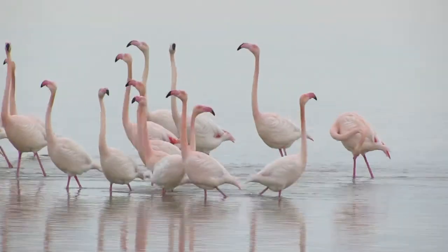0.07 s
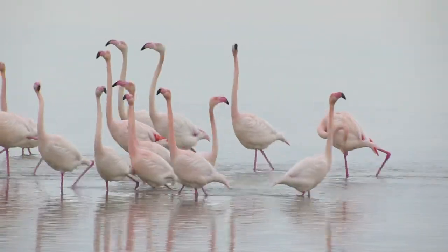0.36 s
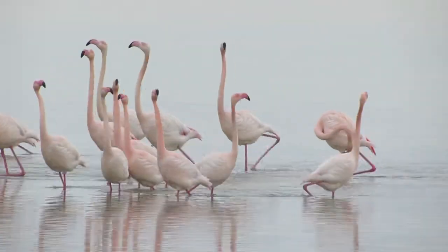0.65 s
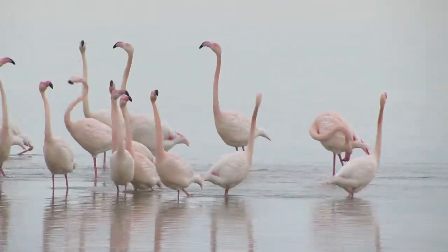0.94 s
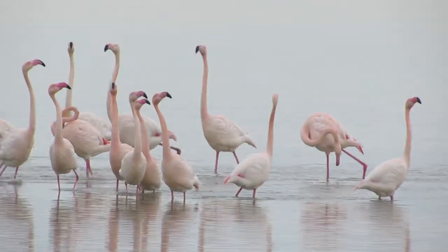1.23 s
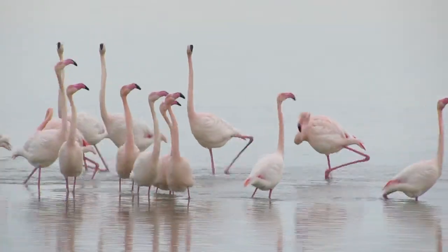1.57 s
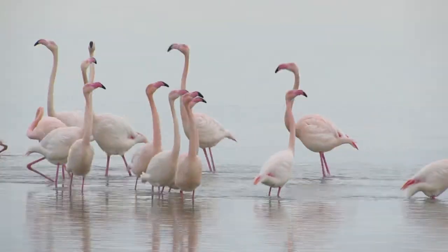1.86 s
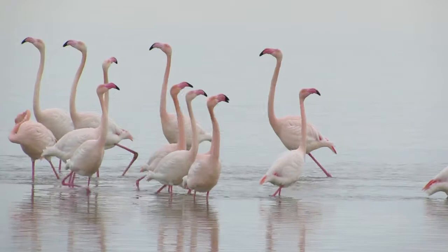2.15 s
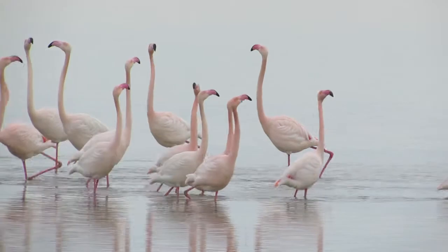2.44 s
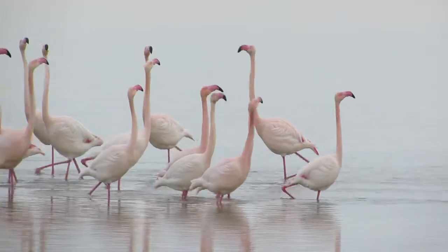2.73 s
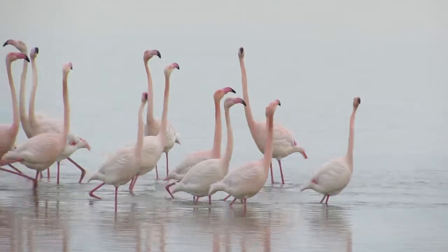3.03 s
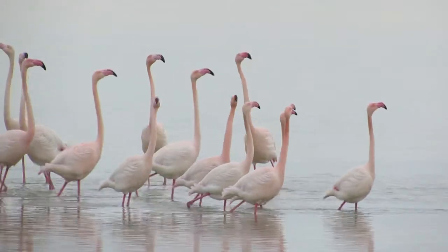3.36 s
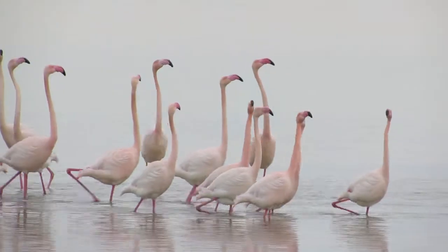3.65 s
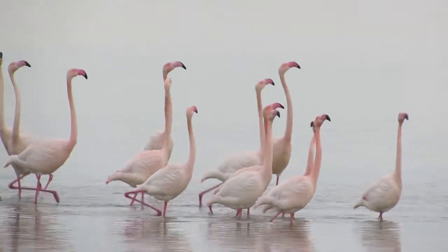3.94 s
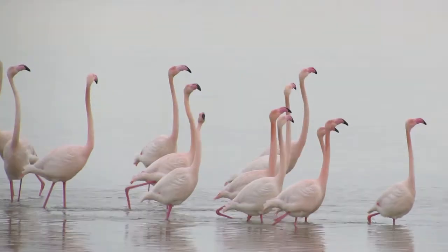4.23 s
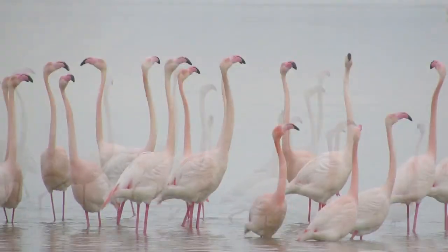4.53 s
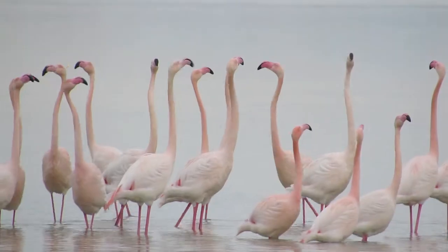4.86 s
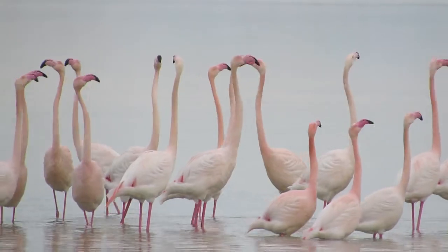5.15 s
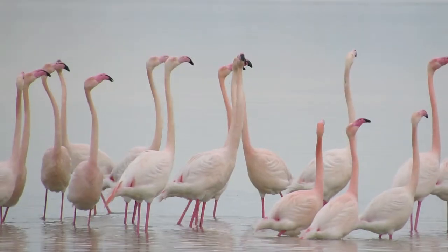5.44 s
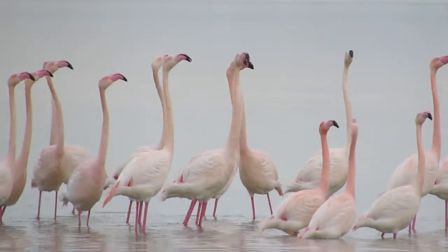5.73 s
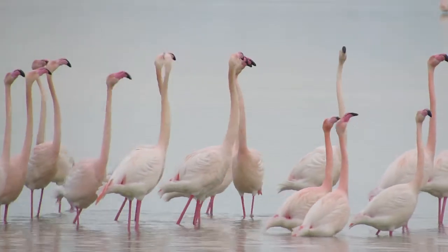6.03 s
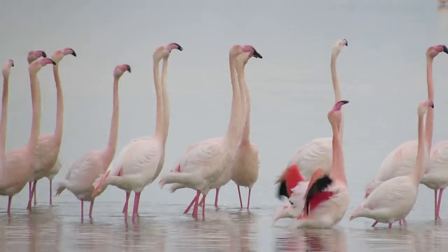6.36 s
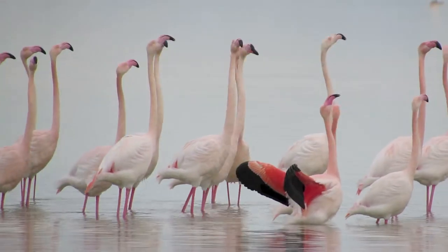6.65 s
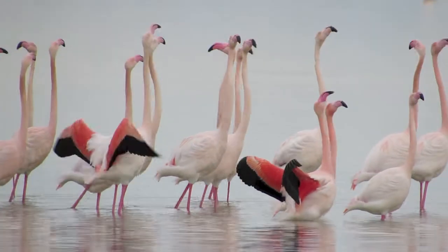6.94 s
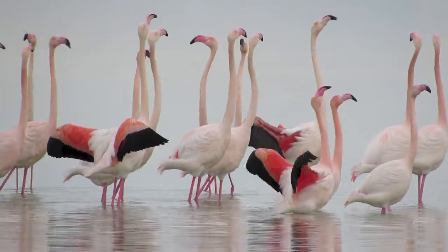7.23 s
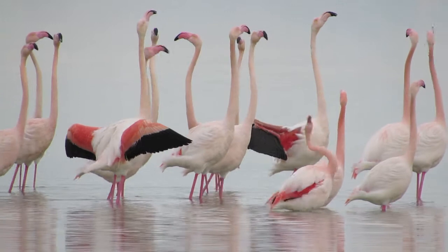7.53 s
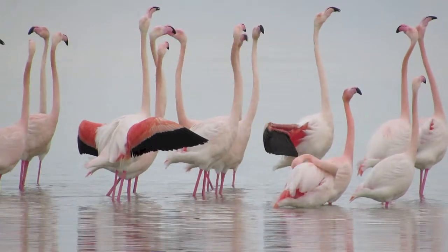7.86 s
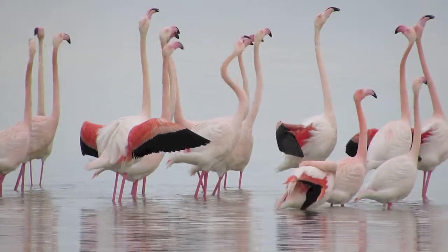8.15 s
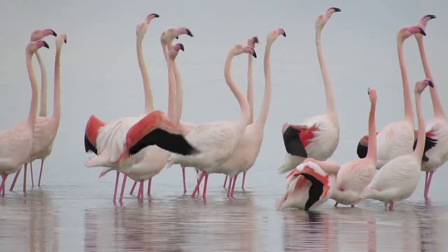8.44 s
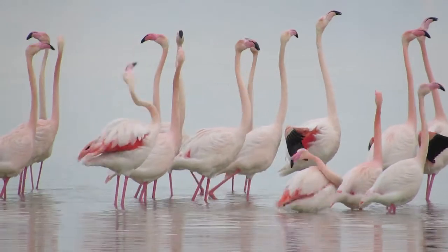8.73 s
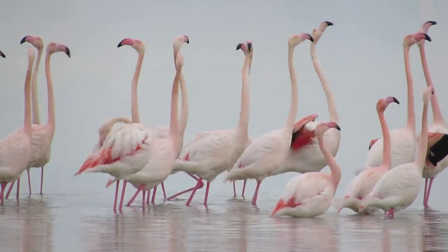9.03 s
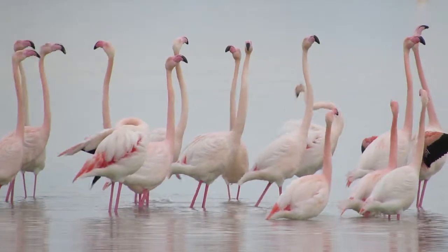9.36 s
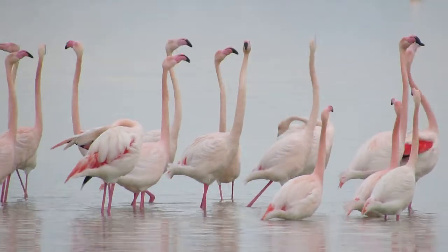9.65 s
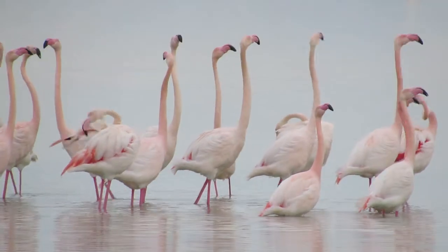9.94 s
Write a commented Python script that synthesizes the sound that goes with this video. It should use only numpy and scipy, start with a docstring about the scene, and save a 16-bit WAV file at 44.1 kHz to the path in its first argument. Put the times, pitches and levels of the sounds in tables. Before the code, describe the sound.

A few flamingos call some way off in an open lagoon, with quick rattling grunts and short nasal honks over the murmur of a distant flock. About halfway through, the whole flock joins in, calling over one another. An occasional falling cry slips between the honks, and a small bird chirps thinly now and then. A low rumble and soft hiss run underneath, with a faint hum growing later.

```python
"""Flamingos parade in a shallow lagoon, some way off. First a few marchers call: rattling grunts (about 65
rasping puffs a second) and some arched, nasal honks, over the far flock's murmur, a low background rumble and a
soft hiss. Just after 2 s comes the first of a few falling cries. At about 4.5 s the scene changes: a fuller
flock calls over one another, a small bird chirps now and then, and a faint low hum grows behind them."""
import sys
import numpy as np
from scipy import signal
from scipy.fft import rfft, irfft, next_fast_len
from scipy.io import wavfile
from scipy.ndimage import uniform_filter1d, map_coordinates

SR = 44100
rng = np.random.default_rng(int(sys.argv[2]) if len(sys.argv) > 2 else 0)


def store_pcm(level_fs):
    """Save levels as 16-bit WAV."""
    pcm = np.round(np.clip(level_fs, -1, 1) * 32767).astype(np.int16)
    wavfile.write(sys.argv[1], SR, np.atleast_2d(pcm).T)


N = 440559
FLOCK_FROM_S = 4.5  # from here on the scene changes to a fuller flock, with other voices


def amp(db):
    """Turn decibels into a number to multiply by."""
    return 10 ** (np.asarray(db) / 20)


def unit(x):
    """Scale a sound to an average power of 1."""
    return x / np.sqrt(np.mean(x ** 2) + 1e-20)


def along(points, hz):
    """Read between (frequency, value) points on a log frequency scale."""
    f, v = np.transpose(points)
    return np.interp(np.log(hz + 1), np.log(f + 1), v)


def loudness(points):
    """Join (time, level) points into a gain for every sample."""
    s, db = np.transpose(points)
    return amp(np.interp(np.arange(N) / SR, s, db))


def filtered(x, response):
    """Multiply each frequency in x by response(frequency)."""
    n = x.shape[-1]
    m = next_fast_len(n + SR // 20)
    return irfft(rfft(x, m) * response(np.fft.rfftfreq(m, 1 / SR)), m)[..., :n]


def shaped(x, tone):
    """Turn lows and highs up or down along (frequency, level) points."""
    return filtered(x, lambda f: amp(along(tone, f)))


def resonance(f, centre_hz, width_hz):
    """A steep peak of power around one frequency, averaging 1."""
    power = 1 / (1 + ((f ** 2 - centre_hz ** 2) / (f * width_hz + 1)) ** 2) ** 2
    return power / power.mean(axis=-1, keepdims=True)


def ringing(gain):
    """A filter with these gains that rings after a tap, not before (minimum phase)."""
    cepstrum = irfft(np.log(gain + 1e-6))
    half = cepstrum.shape[-1] // 2
    fold = np.r_[1, np.full(half - 1, 2), 1, np.zeros(half - 1)]
    return np.exp(rfft(cepstrum * fold))


def add(track, s, sound):
    """Mix a sound into the track at s seconds."""
    start = round(s * SR)
    part = sound[max(0, -start):max(0, N - start)]
    track[max(0, start):][:len(part)] += part


PUFF_LEAD_S = .012  # from the start of a puff's row to its middle


def rattle(length, rate, buzz_hz, half_s=.0049, breath=.27, leak=.1,
           jitter=0.12, scatter_db=1.5, arch_db=5.5):
    """The bird's voice box opens in short puffs, one row each; in each its membranes slap a few times."""
    count = int(length * rate) + 1
    t = np.arange(1536) / SR - PUFF_LEAD_S
    chance = np.random.default_rng(rng.integers(2 ** 32))
    opening = np.exp(-(t / half_s) ** 4) + leak * np.exp(-(t / (2 * half_s)) ** 2)
    beats = np.arange(-4, 5) + chance.random() - .5
    slap_times = (beats + jitter * chance.standard_normal((count, len(beats)))) / buzz_hz
    slaps = np.zeros((count, len(t)))
    slaps[np.arange(count)[:, None], np.searchsorted(t, slap_times)] = 1
    hiss = chance.standard_normal(slaps.shape)
    puffs = np.sqrt(1 - breath) * unit(slaps * opening) + np.sqrt(breath) * unit(hiss * opening)
    place = (np.arange(count) + .5) / count * 2 - 1
    sizes = amp(scatter_db * chance.standard_normal(count) - arch_db * place ** 2)
    return unit(puffs * sizes[:, None]) * np.sqrt(SR / rate / len(t))


# The tone of a grunt's rasp: (frequency [Hz], relative level [dB])
RASP_TONE = [(300, -63), (2400, -27), (3100, 11), (3800, 11), (4500, 15), (5200, 9), (5900, -13),
             (7000, -5.5), (8500, -9.5), (10000, -27), (14000, -7)]


def rasp(f, effort_db, tilt=0.69, most_db=12):
    """Power of the hiss on a grunt: the harder the bird pushes, the higher it reaches."""
    octaves = np.clip(np.log2((f + 1) / 5200), 0, 1)
    lift_db = tilt * np.clip(effort_db, -most_db, most_db) * np.sqrt(octaves)
    return amp(along(RASP_TONE, f) + lift_db) ** 2


# One row a grunt; gape is the share of the power that mouth and beak take:
# (start [s], length [s], puff rate [Hz], throat [Hz], level [dB], gape [0-1], rasp over the level [dB])
GRUNT_CALLS = [(0.002, 0.075, 73.0, 852, -33.5, 0.44, -17.5), (0.086, 0.076, 74.2, 847, -35.0, 0.53, -17.5),
               (0.168, 0.138, 61.8, 796, -38.5, 0.54, -13), (0.335, 0.11, 68.9, 850, -37, 0.6, -20),
               (0.45, 0.09, 71.6, 840, -38.5, 0.9, -19), (0.563, 0.09, 61.0, 875, -44.5, 0.5, -7.5),
               (0.7253, 0.079, 70.0, 796, -36, 0.19, -20), (0.822, 0.099, 64.3, 756, -35, 0.62, -14.5),
               (1.002, 0.081, 68.5, 950.0, -37, 0.7, -16), (1.088, 0.096, 67.6, 783, -38.5, 0.56, -19),
               (1.18, 0.14, 68.0, 776, -42, 0.87, -16), (1.379, 0.1, 74.7, 870, -42, 0.47, -15),
               (1.49, 0.076, 72.1, 712, -37.5, 0.8, -21), (1.571, 0.081, 71.8, 906, -38, 0.83, -9),
               (1.766, 0.102, 63.8, 863, -40, 0.28, -9.0), (1.905, 0.055, 62.2, 752, -38.0, 0.5, -27.0),
               (2.176, 0.06, 75.6, 800, -41.5, 0.1, -41), (2.264, 0.051, 70.2, 652, -39.5, 0.43, -13),
               (2.339, 0.068, 65, 836, -38, 0.14, -9.5), (2.414, 0.11, 59.4, 763, -37, 0.15, -19.5),
               (2.539, 0.121, 62.6, 786, -40.5, 0.16, -16.5), (2.661, 0.137, 62.7, 803, -41, 0.22, -17.5),
               (2.834, 0.071, 64.8, 895.0, -39, 0.34, -12.5), (2.911, 0.087, 63.1, 855, -39, 0.24, -9),
               (3.165, 0.043, 58.5, 780, -46, 0.44, -30), (3.34, 0.048, 69.1, 963, -39.5, 0.23, -10.0),
               (3.443, 0.101, 72.9, 707, -43.5, 0.4, -11), (3.644, 0.089, 63, 846, -39, 0.5, -5.5),
               (3.844, 0.058, 62.1, 880.0, -44.5, 0.28, -12), (3.99, 0.087, 63.7, 862, -39.5, 0.32, -11),
               (4.119, 0.084, 65, 792, -40, 0.43, -9), (4.665, 0.117, 64.2, 870.0, -39.5, 0.02, -11),
               (4.796, 0.121, 69.9, 832, -39.5, 0.06, -9.0), (4.927, 0.144, 59.04, 795, -37, 0.09, -13),
               (5.057, 0.14, 69.4, 877, -39, 0.17, -11), (5.191, 0.107, 69.3, 883, -38.5, 0.1, -10),
               (5.299, 0.123, 69.1, 816, -47, 0.4, -5), (5.518, 0.078, 70.6, 910, -42, 0.23, -9),
               (5.615, 0.105, 70.1, 956, -42, 0.39, -10), (5.722, 0.052, 68.3, 795, -39.5, 0.2, -26.0),
               (5.78, 0.091, 71.6, 896, -37.5, 0.23, -18.0), (5.887, 0.083, 66.3, 775, -37, 0.16, -9),
               (5.977, 0.108, 68.9, 805, -36.5, 0.2, -10.5), (6.129, 0.087, 72.8, 816, -36, 0.16, -10),
               (6.226, 0.1, 72.5, 900, -36.0, 0.24, -8), (6.333, 0.091, 72.0, 942, -35.5, 0.14, -6),
               (6.426, 0.071, 73.8, 817, -38.5, 0.12, -10), (6.665, 0.043, 58.8, 880, -40.0, 0.23, -28),
               (6.713, 0.069, 65.2, 827, -39.5, 0.18, -22), (6.82, 0.104, 71.6, 860.0, -38, 0.28, -29),
               (6.95, 0.06, 58.2, 787, -40.5, 0.07, -10.0), (7.013, 0.091, 61.2, 807, -39.5, 0.4, -7.5),
               (7.188, 0.116, 64.8, 876, -40.5, 0.18, -8), (7.323, 0.134, 63.3, 910.0, -42.5, 0.23, -6.5),
               (7.539, 0.12, 73.5, 886, -40.5, 0.44, -5), (7.649, 0.073, 62.0, 745.0, -45, 0.05, -9),
               (7.733, 0.081, 68.0, 880, -40.5, 0.34, -9), (7.821, 0.116, 73.5, 833, -42, 0.28, -12.0),
               (7.951, 0.087, 72.1, 976, -38, 0.12, -6), (8.044, 0.106, 60.2, 785, -37, 0.35, -8),
               (8.164, 0.086, 63.3, 794, -39, 0.5, -6), (8.254, 0.113, 66.6, 848, -37.5, 0.17, -4),
               (8.422, 0.077, 58.1, 960, -43.5, 0.36, -17.0), (8.518, 0.075, 72.5, 796, -40.5, 0.15, -12),
               (8.631, 0.067, 67.2, 843, -43, 0.45, -6), (8.754, 0.043, 57.8, 890, -45, 0.22, -26),
               (8.831, 0.098, 66.3, 820.0, -36, 0.08, -19.5), (8.93, 0.089, 61.5, 810.0, -42.5, 0.7, -8),
               (9.044, 0.099, 66.5, 756, -35.0, 0.17, -10), (9.199, 0.133, 65, 737, -39, 0.38, -17),
               (9.335, 0.122, 69.5, 860, -42.5, 0.44, -4.5), (9.456, 0.101, 64.7, 844, -41, 0.2, -5.5),
               (9.578, 0.09, 72.3, 963, -38.5, 0, -8.5), (9.873, 0.021, 70.6, 973, -37.5, 0.39, -5),
               (9.923, 0.071, 63.35, 810, -34.5, 0.18, -18)]
# The marchers' voice, then the flock's: (mouth [Hz], mouth width [Hz], beak [Hz], beak width [Hz],
# mouth over beak [dB], extra push on the rasp [dB], rasp pitch [ratio])
GRUNT_VOICES = [(1205, 760, 2090, 320, 0, 23, 1.097), (1110, 940, 2650, 1400, -1.5, 14.5, 0.987)]


def grunts(throat_width_hz=330, glide=0.2, quiver=0.1, spread=0.045):
    """Each puff rings throat, mouth and beak, with a rasp on top; a wider gape favours mouth and beak."""
    out = np.zeros(N)
    quirks = rng.standard_normal((len(GRUNT_CALLS), 3))
    for (s, length, rate, throat_hz, db, gape, rasp_db), (slide, mouth, beak) in zip(GRUNT_CALLS, quirks):
        voice = GRUNT_VOICES[int(s > FLOCK_FROM_S)]
        mouth_hz, mouth_width, beak_hz, beak_width, mouth_db, push_db, rasp_ratio = voice
        mouth_hz *= 1 + spread * mouth
        beak_hz *= 1 + spread * beak
        puffs = rattle(length, rate, buzz_hz=throat_hz)  # the membranes lock to the throat
        f = np.fft.rfftfreq(puffs.shape[1], 1 / SR)
        wobble = 1 + quiver * np.resize(rng.standard_normal(16), len(puffs))
        bend = (np.exp(glide * slide * np.linspace(-.5, .5, len(puffs))) * wobble)[:, None]
        mouth_share = 1 / (1 + amp(-mouth_db) ** 2)
        parts = [(1 - gape, resonance(f, throat_hz * bend, throat_width_hz)),
                 (gape * mouth_share, resonance(f, mouth_hz * bend, mouth_width)),
                 (gape * (1 - mouth_share), resonance(f, beak_hz * np.sqrt(bend), beak_width)),
                 (amp(rasp_db) ** 2, rasp(f / rasp_ratio, rasp_db + push_db))]
        source = rfft(puffs)
        source_power = unit(np.abs(source)) ** 2
        power = sum(share * shape / np.mean(shape * source_power) for share, shape in parts)
        for k, puff in enumerate(irfft(source * ringing(np.sqrt(power)))):
            add(out, s + k / rate - PUFF_LEAD_S, amp(db) * puff)
    return out


# One row a honk: (middle [s], length [s], top pitch [Hz], pitch sag at the ends [0-1],
# base level [dB], mouth opening [dB], nasal edge [dB])
HONK_CALLS = [(0.0, 0.11, 765, 0.06, -38.5, 2, -3), (0.28, .054, 747, 0.06, -42.5, 9, 0),
              (0.607, 0.18, 550, .05, -44.5, -5, -9), (0.919, 0.1, 618, 0, -39.5, -0.5, 0),
              (1.63, 0.13, 778, 0.07, -38, 2, -6), (2.31, 0.091, 494.5, 0.05, -42.5, -9, -15),
              (2.441, 0.16, 494, 0.19, -42.5, -6.5, -23), (2.538, .13, 614, 0.07, -40.5, 1.5, -11),
              (3.471, 0.14, 634, 0.13, -44, -0.5, -16), (3.486, 0.12, 771, 0.04, -37, -0.5, 0.5),
              (3.601, 0.14, 645, 0.18, -41.5, 3.5, -15), (4.338, 0.11, 618, 0.13, -50.5, -4, -10),
              (4.495, 0.093, 647, 0.28, -47.5, -1, -27), (4.615, 0.17, 643, 0.16, -44.5, -2, -12),
              (4.703, .086, 494, .05, -43, -0.5, -2), (4.707, 0.092, 784, 0.08, -43, -2, 3),
              (4.835, .14, 497.5, .04, -39.5, -4, -5), (4.835, 0.12, 712, 0.12, -46, 2, 4),
              (5.244, 0.1, 723, .03, -38, -3, -6), (5.381, 0.095, 634.6, 0.18, -35, -3.5, -5.5),
              (5.507, 0.16, 642, 0.14, -40, -3, -32), (5.83, 0.11, 705, 0.08, -37.5, -12, 0.5),
              (5.902, 0.14, 621, 0.08, -39.5, -5, -13), (6.298, 0.25, 641.4, 0.18, -38.5, -2.5, -1.5),
              (6.406, .093, 742, 0.26, -42, 3, -1), (6.527, 0.13, 739, 0.03, -39, 0, 4.5),
              (6.896, 0.11, 705, 0.1, -41.5, -4, -2), (7.096, .14, 621, 0.19, -36.5, -5.5, -5),
              (7.196, 0.13, 644, 0.3, -38, -1.5, -1.5), (7.39, 0.14, 729, .09, -40, -3, -1),
              (7.486, 0.13, 734, 0.04, -38.5, -1, 1.5), (7.738, 0.1, 498, 0.08, -40.5, -5, -3),
              (7.808, .098, 728, .05, -38, -8, -4), (7.877, 0.12, 493, 0.08, -38, -11, -12),
              (7.885, 0.073, 700, 0.05, -36, -9, -7), (8.092, .16, 751.6, 0.08, -38.5, 3.5, 1.5),
              (8.252, 0.12, 644, 0.03, -37, -7, -4), (8.366, 0.12, 726, 0.05, -44, 1, -1),
              (8.463, .12, 737, 0, -39, -0.5, 1), (8.617, .11, 561, 0.13, -44.5, 4, -3),
              (8.671, 0.094, 620.5, .05, -39, -3.5, 4), (8.965, 0.16, 723, 0.09, -37, -3, -3),
              (9.073, .11, 623, 0.17, -40.5, -2, 0.5), (9.217, .13, 651, 0.06, -41, -2, -10),
              (9.407, .11, 756, .06, -37.5, -1, 5.5), (9.478, .087, 496, 0.1, -38, -6.5, -3),
              (9.619, .14, 483, 0.08, -40, -4.5, -13), (9.758, .15, 580, 0.09, -44, -4, -5)]
# The lower a honk, the hoarser: (pitch [Hz], hoarseness [0-1])
HOARSENESS = [(492, 0.35), (630, 0.1), (735, .06)]
# How ragged a honk's waves are: (marchers [radians], flock [radians])
RAGGEDNESS = [.015, .05]
# How throat and beak colour a honk, for the marchers, then the flock: (frequency [Hz], boost [dB])
THROAT_TONES = [
    [(490, -4.5), (620, -3.5), (770, 3), (980, 8.5), (1240, 2), (1540, -5), (1900, -7), (2300, -10.5),
     (3100, -13.5), (3900, -17), (4800, -9), (6200, -16.5), (7200, -22.5), (9000, -23), (13000, -50)],
    [(490, -9), (620, -3.5), (740, 1.5), (980, 6), (1240, 3), (1480, -4), (1900, -12.5), (2250, -15),
     (3000, -12), (3800, -13), (5000, -10.5), (6000, -26), (7200, -40), (9000, -28), (13000, -56)],
]
# An open mouth lifts the second harmonic most: (harmonic [number], share of the opening [0-1])
MOUTH_LIFT = [(1, 0), (2, 1), (3, .5), (5, 0)]
# A nasal edge acts on the high harmonics: (frequency [Hz], share of the edge [0-1])
NASAL_LIFT = [(1400, 0.02), (2300, 0.2), (4500, 1)]


def honks(waver=0.0014, shake=0.044, flutter=0.26, flutter_hz=65,
          scatter_db=2, brighten=0.26, fray_hz=600):
    """Harmonics (multiples of one pitch) arch in pitch, loudness and brightness; hoarse honks shake."""
    out = np.zeros(N)
    k = np.arange(1, 15)  # harmonic numbers
    for s, length, pitch_hz, sag, db, mouth_db, edge_db in HONK_CALLS:
        group = int(s > FLOCK_FROM_S)
        hoarse = along(HOARSENESS, pitch_hz)
        place = np.linspace(-1, 1, int(length * SR))  # 0 is the middle of the honk
        drift = map_coordinates(rng.standard_normal(12), [(place + 1) * 5.5])
        tremor = map_coordinates(rng.standard_normal(31), [(place + 1) * 15])
        bend = 1 - sag * place ** 2 + waver * drift + (waver + shake * hoarse) * tremor
        # no two waves are quite alike, which frays the high harmonics
        fray = map_coordinates(rng.standard_normal(256), [(place + 1) / 2 * length * fray_hz], mode="wrap")
        phase = 2 * np.pi * np.cumsum(pitch_hz * bend) / SR + RAGGEDNESS[group] * fray
        throat_db = along(THROAT_TONES[group], k * pitch_hz) + mouth_db * along(MOUTH_LIFT, k)
        nasal_db = along(NASAL_LIFT, k * pitch_hz) * (edge_db + scatter_db * rng.standard_normal(len(k)))
        swell = np.sin(np.pi / 2 * np.abs(1 - place ** 2)) ** (1.8 + brighten * k[:, None])
        tone = amp(db + throat_db + nasal_db) @ (swell * np.sin(k[:, None] * phase))
        throb = np.sin(2 * np.pi * (flutter_hz * place * length / 2 + rng.random()))
        add(out, s - length / 2, np.sqrt(2) * (1 + flutter * hoarse * throb) * tone)
    return out


# How the far flock's murmur rises and falls: (time [s], relative level [dB])
MURMUR_LEVELS = [(0.0, -33.5), (1.5, -36), (2.2, -42), (2.42, -37.5), (2.73, -40.5), (3.17, -40.5),
                 (3.59, -42), (3.7, -42), (4.48, -40.5), (4.84, -33.5), (6.37, -35.5), (6.57, -44),
                 (7.15, -29), (7.54, -38), (8.24, -31.5), (8.71, -39), (9.29, -33.5), (9.99, -40)]
# The murmur's tone: (frequency [Hz], relative level [dB])
MURMUR_TONE = [(20, -85), (250, -21), (450, -16), (620, -5), (800, -3), (1200, -6), (1700, -19),
               (3000, -20.5), (5000, -28), (9000, -85), (14000, -60)]
# Behind the marchers the far flock is further off and duller: (frequency [Hz], boost [dB])
EARLY_DULLING = [(450, 3.5), (900, -2), (1500, 0), (2500, -0.5), (5000, -6.5)]


def far_flock(level_db=-3, count=140):
    """Many more birds grunt further off and blend into a murmur."""
    early, late = np.zeros((2, N))
    for i, (when, size, speed, voice) in enumerate(rng.random((count, 4))):
        rate = 58 + 14 * speed
        start = (i + when - 2) / (count - 2) * N / SR
        for k, puff in enumerate(rattle(.1 + .1 * size, rate, buzz_hz=600 + 400 * voice)):
            add(late if start > FLOCK_FROM_S else early, start + k / rate, puff)
    voices = shaped(early, EARLY_DULLING) + late
    return amp(level_db) * loudness(MURMUR_LEVELS) * unit(shaped(voices, MURMUR_TONE))


def joining_in(near, follow=0.42, bout_s=0.049, phrase_s=0.78):
    """The flock calls in bouts: this gain makes far birds swell and pause with the near ones."""
    bout, phrase = (np.abs(uniform_filter1d(near ** 2, int(s * SR))) + 1e-6 for s in (bout_s, phrase_s))
    return unit(uniform_filter1d(np.sqrt(bout / phrase) ** follow, int(bout_s * SR)))


# Level of the background rumble; it dips briefly near 4.6 s: (time [s], level [dB])
RUMBLE_LEVELS = [(0.0, -48.5), (4.4, -49.5), (4.62, -59), (4.8, -50.5), (7.8, -51), (9.99, -48)]
# Tones of the rumble, the hiss and the microphone's noise: (frequency [Hz], relative level [dB])
RUMBLE_TONE = [(8, -40), (22, -8.5), (60, 0.5), (85, -2), (120, -8), (200, -13), (400, -41)]
HISS_TONE = [(60, -32), (170, -3.5), (300, -0.5), (450, -4), (800, -21), (1500, -10), (3000, -11.5),
             (6500, -14.5), (14000, -27.5)]
MIC_NOISE_TONE = [(8, -38), (22, 1), (65, -12), (95, -4), (144, -5.5), (256, -7.5), (400, -10), (687, -14),
                  (900, -19), (3500, -32.5), (5000, -32.5), (14000, -45)]


def background(hiss_db=-56, mic_db=-43):
    """Background rumble and soft hiss, plus low microphone noise that is opposite at the two ears."""
    rumble, hiss, mic_noise = (unit(shaped(rng.standard_normal(N), tone))
                               for tone in (RUMBLE_TONE, HISS_TONE, MIC_NOISE_TONE))
    opposite = np.array([[1], [-1]])
    return loudness(RUMBLE_LEVELS) * rumble + amp(hiss_db) * hiss + amp(mic_db) * opposite * mic_noise


# How long the shore echoes: (frequency [Hz], time to fade by 60 dB [s])
ECHO_TIMES = [(300, 1), (1500, 0.6), (8000, 0.25)]


def shore_echo(x):
    """The open shore sends back a blurred echo, different at each ear."""
    hz, t, noise = signal.stft(rng.standard_normal((2, SR // 2)), SR, nperseg=256)
    fade = amp(-60 * t / along(ECHO_TIMES, hz)[:, None])
    tail = signal.istft(noise * fade, SR, nperseg=256)[1]
    return signal.fftconvolve(x[None], tail / np.linalg.norm(tail[0]), axes=1)[:, :N]


# One row a cry: (start [s], length [s], first pitch [Hz], last pitch [Hz], level [dB])
FALLING_CRIES = [(2.25, 0.071, 1290, 1064, -37), (2.677, .12, 1000, 815, -58), (6.69, 0.17, 920, 748, -38),
                 (7.671, 0.12, 1330, 926, -35.5), (8.458, 0.06, 1180, 1060, -33.5)]


def cries(flutter=0.21, flutter_hz=65, octave_db=-15):
    """A fluttering note slides down as the bird runs out of push."""
    out = np.zeros(N)
    for s, length, first_hz, last_hz, db in FALLING_CRIES:
        t = np.arange(int(length * SR)) / SR
        phase = 2 * np.pi * np.cumsum(first_hz + (last_hz - first_hz) * t / length) / SR
        tone = np.sin(phase) + amp(octave_db) * np.sin(2 * phase)
        throb = 1 + flutter * np.sin(2 * np.pi * (flutter_hz * t + rng.random()))
        add(out, s, amp(db) * np.sin(np.pi * t / length) * throb * tone)
    return out


# The shape of one chirp: (time into it [s], base pitch [Hz], relative level [dB])
CHIRP_SHAPE = [(0, 6700, -14), (.019, 7500, 0), (.04, 6850, -2), (.052, 7800, 0), (.059, 7600, 0),
               (.067, 7800, -2), (.079, 5700, -12)]
# One row a chirp: (start [s], pitch [ratio], level [dB])
CHIRP_CALLS = [(4.476, 1, -41), (4.81, .89, -43), (6.385, .96, -47), (7.73, .93, -53), (8.075, .91, -50),
               (9.055, .87, -53)]


def small_bird():
    """A thin whistle swings up twice and drops."""
    out = np.zeros(N)
    when, hz, db = np.transpose(CHIRP_SHAPE)
    t = np.arange(int(when[-1] * SR)) / SR
    soft_ends = signal.windows.tukey(len(t), .1)
    for s, ratio, level_db in CHIRP_CALLS:
        phase = 2 * np.pi * np.cumsum(ratio * np.interp(t, when, hz)) / SR
        add(out, s, amp(level_db + np.interp(t, when, db)) * soft_ends * np.sin(phase))
    return out


# The faint hum behind the flock: (time [s], level [dB])
HUM_LEVELS = [(4.5, -78), (6, -60), (8, -55.5), (9.99, -61)]


def hum(centre_hz=185, width_hz=45, octave_db=-7):
    """A narrow band of low noise and another an octave up, unrelated at the two ears."""
    def bands(f):
        octave = amp(octave_db) ** 2 * resonance(f, 2 * centre_hz, width_hz)
        return np.sqrt(resonance(f, centre_hz, width_hz) + octave)
    return loudness(HUM_LEVELS) * unit(filtered(rng.standard_normal((2, N)), bands))


# The birds' voices roll off steeply above 11 kHz: (frequency [Hz], boost [dB])
TREBLE_ROLL_OFF = [(9000, 0.5), (11000, 0.5), (13500, -41)]


def scene(echo_db=-18, lean_db=1):
    """The flock stands ahead; its low notes lean a little to the right."""
    near = grunts()
    birds = near + honks() + cries() + joining_in(near) * far_flock() + small_bird()
    birds = shaped(birds, TREBLE_ROLL_OFF)
    lean = lambda f: amp(np.array([[-1], [1]]) * along([(700, lean_db), (1900, 0)], f))
    return filtered(birds[None], lean) + amp(echo_db) * shore_echo(birds) + background() + hum()


# Narrow bands the microphone hears poorly: (frequency [Hz], width [Hz], depth [0-1])
MICROPHONE_DIPS = [(3952, 244, 0.87), (7550, 160, 1)]


def record(dry, top_hz=14200):
    """The microphone has two narrow dips and hears nothing above top_hz."""
    def response(f):
        dips = [1 - depth / (1 + ((f - hz) / (width / 2)) ** 2) for hz, width, depth in MICROPHONE_DIPS]
        return np.prod(dips, axis=0) * (f < top_hz)
    return filtered(dry, response)


dry = scene()
out = record(dry)
store_pcm(out)
```